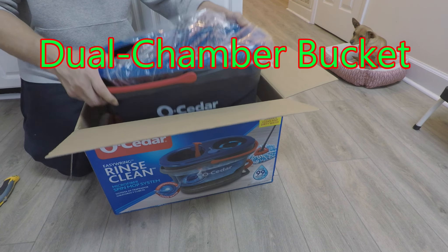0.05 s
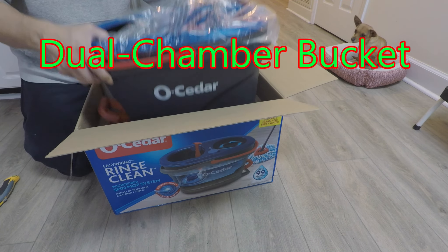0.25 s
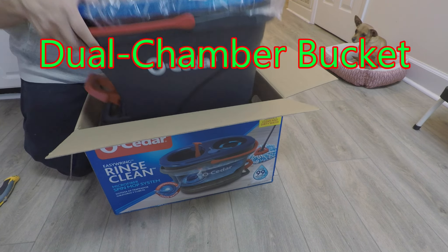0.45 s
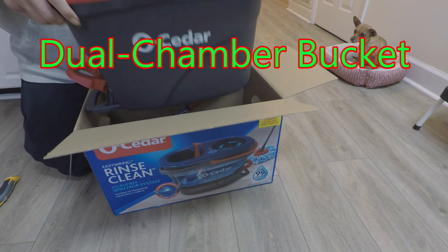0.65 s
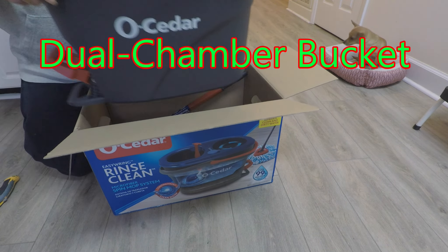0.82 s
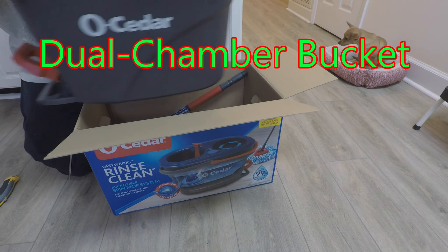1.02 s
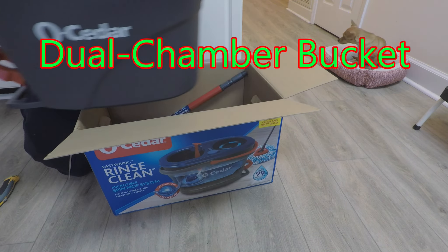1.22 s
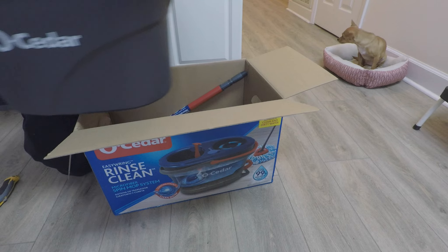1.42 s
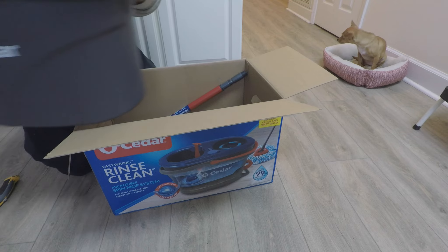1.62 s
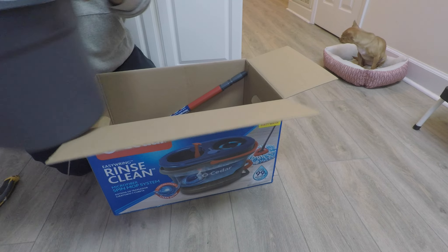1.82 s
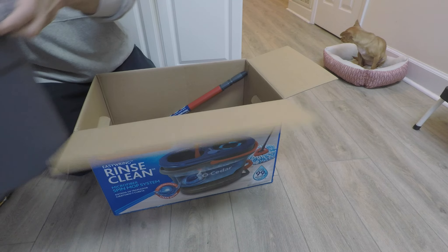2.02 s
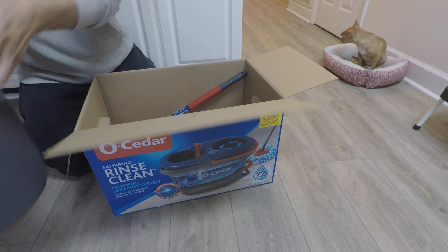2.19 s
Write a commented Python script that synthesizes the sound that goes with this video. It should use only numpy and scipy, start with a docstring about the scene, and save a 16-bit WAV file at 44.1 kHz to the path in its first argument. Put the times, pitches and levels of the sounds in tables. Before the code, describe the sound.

A plastic bucket rubs and knocks against cardboard with low, hollow thumps as it is pulled from a box. After a lull it lightly taps a loose flap, and plastic wrap crinkles faintly in the small, quiet room.

```python
"""Plastic rubs up cardboard, catches and knocks: a bucket is pulled from its box in a small quiet room.
Each rub is a stream of tiny slips; each knock sets the bucket ringing, over low booms of box and bucket.
After a lull the bucket brushes past a loose flap with hollow taps and is carried aside,
with ticks of creased plastic wrap, a soft rustle and one faint squeak."""
import sys
import numpy as np
from scipy import signal
from scipy.fft import rfft, irfft
from scipy.io import wavfile

SR = 44100
rng = np.random.default_rng(int(sys.argv[2]) if len(sys.argv) > 2 else 0)


def digitize_waveform(pressure):
    """Quantize a signal to 16-bit integers and store it at the path in sys.argv[1].

    Rows of a 2-D input are taken as channels; values are limited to [-1, 1].
    """
    field = np.atleast_2d(pressure).T
    bounded = np.clip(field, -1, 1)
    quanta = np.round(bounded * 32767).astype(np.int16)
    wavfile.write(sys.argv[1], SR, quanta)


N = 103635

# colour of plastic on cardboard: f/Hz, gain/dB
CONTACT_EQ = [(30, -50), (100, 7.5), (170, 5.5), (300, 2.5), (375, -8.5), (480, 2.5), (620, 2.5),
              (740, -4.5), (1100, -3), (1300, -9.5), (2000, -9), (2600, -12.5), (4700, -19.5),
              (5800, -22.5), (7500, -24.5), (12000, -32), (15000, -39)]
# damped resonances of the bucket's shell: f/Hz, width/Hz, gain/dB
SHELL_PEAKS = [(453, 18.6, 6.5), (610, 100, -5.5), (1437, 290, -2), (1980, 100, 0.5), (2880, 90, -4),
               (3717, 156, 6), (4560, 270, 3), (5040, 144, 9.5), (6410, 65, -6), (7350, 520, 8.5),
               (8360, 130, 8.5), (9950, 510, 7.5), (11930, 1030, 11)]
# the notes the bucket rings with: f/Hz, level/dB, t60/s
BUCKET_MODES = [(160.5, -18.5, .2), (293, -26.5, 0.23), (311.8, -21, 0.16), (466.5, -22, 0.26),
                (568, -33, 0.15), (571, -20.5, 0.068), (651, -23, 0.12), (828, -29, 0.28),
                (1120, -32.5, 0.43), (1590, -28, 0.21), (2036, -32, 0.12), (2915, -29, 0.11),
                (3660, -33.5, 0.084)]
# bucket hits box: t/s, level/dB, bass/dB, crack/dB, top/dB, crunch decay/s, ring/dB, favoured f/Hz
BUCKET_KNOCKS = [(.0618, -48, 9, 8, -15, 0.0085, -4, 610), (.071, -39, 8, -1.5, -3, 0.015, -1.5, 175),
                 (.230, -22, -14, 7, 3.5, 0.0092, -2.5, 455),
                 (.2358, -10.5, -6, -6.5, 2.5, 0.0049, -9.5, 587), (.2398, -17, -1, 2, 17, 0.003, -1, 242),
                 (.3965, -35, -7, -20, -7, 0.0025, 6.5, 590), (.402, -35, 6, -4.5, 0.5, 0.014, 3.5, 163),
                 (.5122, -16, 5, -1.5, -25, 0.0087, -4, 175), (.530, -22, -0.5, -10, 0, 0.0049, -1.5, 312),
                 (.545, -34, 1, 3, 8, 0.0046, -1, 460), (.6145, -19.5, -3.5, 5, -8.5, 0.0065, -3.5, 298),
                 (.650, -24.5, -10, 6.5, 9, 0.0038, -15, 302), (.692, -32, -4, 1, -6, 0.0072, 3, 586),
                 (.889, -41, 3.5, 2.5, -1, 0.007, -6, 620), (.911, -43, 1, 5, -21, 0.0084, -0.5, 175),
                 (2.345, -46, 1, 24.5, 20, 0.002, 0, 610)]


def knock(level_db, bass_db, crack_db, top_db, decay, ring_db, spot_hz):
    """The bucket catches on the box: a short crunch of contact, then its modes ring on."""
    t = np.arange(SR // 2) / SR
    out = np.zeros(len(t))
    for hz, db, t60 in BUCKET_MODES:
        out += amp(db + ring_db + favour_db(hz, spot_hz) - 60 * t / t60) * np.sin(2 * np.pi * hz * t)
    crunch = burst(decay)
    crunch *= np.minimum(t[:len(crunch)] / 0.00062, 1)  # cardboard yields, softening the attack
    shell_db = 0.2 * (level_db + 20)  # harder knocks wake the shell more
    add(out, 0, resonate(colour(crunch, CONTACT_EQ), SHELL_PEAKS, shell_db))
    return tone(out, level_db, bass_db, crack_db, top_db)


# strokes up the box walls: t/s, rise/s, fall/s, level/dB, bass/dB, crack/dB, top/dB
WALL_RUBS = [(0, 0.0026, 0.38, -54.5, 9.5, 0.5, 10.5), (.14, 0.043, 0.11, -39.5, -0.5, 2.5, 7.5),
             (.205, 0.042, 0.015, -26.5, -5, 0.5, -2), (.43, 0.055, 0.054, -42, -12, 1, 14),
             (.496, 0.015, 0.017, -31.5, -10.5, 3.5, 17.5), (.522, 0.0074, 0.032, -30, 4, 0.5, 4.5),
             (.616, 0.014, 0.054, -27, -7, 5.5, 2.5), (.66, 0.022, 0.085, -38.5, 1, 6.5, 4.5),
             (.87, 0.028, 0.26, -54.5, 4.5, 4, 2), (1.70, 0.038, 0.13, -58, -13, 6.5, 5),
             (1.96, 0.045, 0.31, -52.5, -1, -7, -9)]


def rub(rise, fall, *tone_db):
    """Plastic slips along cardboard in one swell; the shell flexes, so its resonances wander."""
    t = np.arange(0, rise + fall, 1 / SR)
    swell = np.interp(t, [0, rise, rise + fall], [0, 1, 0])
    slips = grains(SR, per_s=9000, spread_db=4)[:len(t)] * swell
    progress = t / (rise + fall)
    out, flex = 0, 0.07
    for fade in 1 - progress, progress:  # crossfade between two detunings of the shell
        flexed = [(hz * (1 + flex * rng.uniform(-1.14, 1)), width, db) for hz, width, db in SHELL_PEAKS]
        out = out + resonate(colour(slips * fade, CONTACT_EQ), flexed, ring_db=-13.5)
    return tone(out, *tone_db)


# low booms of box and bucket: t/s, f/Hz, level/dB, rise/s, t60/s
LOW_BOOMS = [(0, 73.1, -44, 0.011, 0.86), (0.183, 62.5, -40.5, 0.009, 0.22),
             (.238, 56, -29.5, 0.029, 0.048), (0.286, 61.5, -30.5, 0.019, 0.062),
             (0.406, 70.6, -47.5, 0.014, 0.48), (.511, 66.4, -23, 0.015, 0.29),
             (0.637, 66.3, -30, 0.027, 0.35), (0.7503, 82.2, -39, 0.01, 0.25),
             (1.857, 151, -55.5, 0.011, 0.25), (1.862, 81.7, -47.5, 0.015, 0.47),
             (2.031, 29, -34.5, 0.025, 0.14), (2.107, 75.4, -43, 0.025, 0.15)]


def boom(hz, level_db, rise, t60):
    """A low note swells and dies away."""
    t = np.arange(SR) / SR
    envelope = np.minimum(t / rise, 1) * amp(level_db - 60 * np.maximum(t - rise, 0) / t60)
    return -envelope * np.sin(2 * np.pi * hz * t)


# dull body of the flap: f/Hz, gain/dB
FLAP_EQ = [(60, -5.5), (230, 2), (600, -6.5), (900, -12), (1500, -8.5), (2200, -28), (12000, -27)]
# its hollow resonances: f/Hz, width/Hz, gain/dB
FLAP_PEAKS = [(298.5, 10, -0.5), (416, 19, 4.5), (517, 18, -2), (731, 44, 12), (1350, 240, -4)]
# bucket brushes flap: t/s, level/dB, rise/s, decay/s, crack/dB, favoured f/Hz
FLAP_HITS = [(1.751, -41.5, 0.0072, 0.0067, 7, 1310), (1.830, -31, 0.0012, 0.017, -3, 423),
             (1.851, -32.5, 0.0026, 0.0108, -13, 317), (2.019, -38, 0.0048, 0.013, -9, 714),
             (2.051, -38.5, 0.0062, 0.011, -12, 735)]


def flap(level_db, rise, decay, crack_db, spot_hz):
    """A soft, hollow tap on the loose cardboard flap."""
    tap = burst(decay)
    tap *= np.minimum(np.arange(len(tap)) / SR / rise, 1)
    peaks = [(hz, width, db + favour_db(hz, spot_hz)) for hz, width, db in FLAP_PEAKS]
    return tone(resonate(colour(tap, FLAP_EQ), peaks), level_db, 0, crack_db, 0)


# plastic wrap ticks: t/s, level/dB, centre f/Hz, decay/s
WRAP_TICKS = [(.0135, -46.5, 10500, 0.00057), (.1153, -47, 12800, 0.0016), (.1325, -42, 7360, 0.00037),
              (.8955, -50.5, 7800, .001), (.9625, -52.5, 7300, 0.00084), (1.0, -46, 3000, 0.003),
              (1.1755, -48, 6800, 0.0014), (1.327, -51.5, 4630, .0008), (1.8215, -43, 3830, 0.0015),
              (1.8305, -50, 13000, 0.0014), (1.8472, -39.5, 8650, 0.00089), (1.852, -49, 12500, 0.004),
              (1.9025, -48, 11100, 0.00077), (1.9405, -49.5, 8240, 0.0057), (1.972, -37, 9100, 0.00057),
              (2.029, -34, 12800, 0.002), (2.1875, -40.5, 8700, 0.0021), (2.210, -40, 4960, 0.001),
              (2.249, -45, 8000, .001), (2.262, -50, 8600, .002), (2.277, -45.5, 7600, 0.0036)]


def tick(level_db, centre_hz, decay, octaves=0.59, ripple_db=4.5):
    """One crease of the wrap snaps, with its own uneven colour."""
    hz = np.geomspace(1000, 16000, 48)
    hump_db = -10 * np.log10(1 + (np.log2(hz / centre_hz) / octaves) ** 4)
    crease_db = hump_db + ripple_db * np.clip(rng.standard_normal(len(hz)), -1.5, 1.5)
    # the ripple changes the colour but not the power
    crease_db -= 10 * np.log10(np.sum(hz * amp(crease_db) ** 2) / np.sum(hz * amp(hump_db) ** 2))
    return amp(level_db) * colour(burst(decay), [(100, -45), *zip(hz, crease_db)])


# colour of wrap and sleeve: f/Hz, gain/dB
RUSTLE_EQ = [(100, 5), (700, -3), (1500, -3), (3200, -1.5), (5500, -6), (8000, -9.5), (13000, -13.5),
             (16000, -26)]
# their rustle through the carry: t/s, level/dB, brightness/dB
RUSTLE_RIDE = [(1.65, -85, 14), (1.82, -65, 3), (1.92, -70, 6), (2.0, -57, 8.5), (2.08, -61, 0.5),
               (2.18, -62, -2), (2.27, -58.5, 4), (2.35, -60.5, -5)]


def rustle():
    """Fine crinkling that grows, and dulls, as the bucket swings aside."""
    times, level_db, bright_db = np.transpose(RUSTLE_RIDE)
    t = np.arange(N) / SR
    crinkle = unit(colour(grains(N, per_s=5000, spread_db=3.2), RUSTLE_EQ)[:N])
    highs = signal.sosfiltfilt(signal.butter(2, 7000, "high", fs=SR, output="sos"), crinkle)
    tilt = amp(np.interp(t, times, bright_db) / 2)
    envelope = amp(np.interp(t, times, level_db)) * (t > times[0])
    return ((crinkle - highs) / tilt + highs * tilt) * envelope


def squeak(length, hz, width_hz, rise_hz_per_s, level_db):
    """Fast slips excite one narrow, slowly rising resonance."""
    t = np.arange(0, length, 1 / SR)
    slips = np.exp(2j * np.pi * rng.random(SR))
    flutter = signal.lfilter([1], [1, -np.exp(-np.pi * width_hz / SR)], slips)[:len(t)]
    glide = np.exp(2j * np.pi * np.cumsum(hz + rise_hz_per_s * t) / SR)
    return amp(level_db) * unit((flutter * glide).real) * np.sin(np.pi * t / length)


# reverb time: f/Hz, t60/s
ROOM_DECAY = [(80, 1), (300, 0.25), (1000, 0.77), (3000, 0.63), (7000, 0.57), (14000, 0.32)]
# reverb return: f/Hz, level/dB
ROOM_RETURN = [(100, -6.5), (500, -9), (2500, -12.5), (7000, -13), (14000, -17.5)]


def room(x, predelay_s=0.006):
    """Dense reflections of a small hard-floored room, each band dying at its own speed."""
    hz, t, bands = signal.stft(rng.choice([-1., 1.], SR // 2), SR, nperseg=256)
    t60 = read(ROOM_DECAY, hz)[:, None]
    bands *= amp(read(ROOM_RETURN, hz)[:, None] - 60 * t / t60)
    bands *= np.sqrt(2 * np.log(1000) / t60 / SR)  # a longer tail gains no energy
    tail = signal.istft(bands, SR, nperseg=256)[1]
    out = np.zeros(N)
    add(out, predelay_s, signal.fftconvolve(x, tail))
    return out


# colour of the room tone: f/Hz, gain/dB
ROOM_TONE_EQ = [(8, -0.5), (22, -4), (37, 3), (52, -13.5), (72, -10), (115, -21), (170, -24.5), (320, -22),
                (480, -28), (900, -33.5), (2000, -36.5), (6000, -42.5), (15500, -47)]


def room_tone(level_db):
    """A steady bed of low rumble and faint hiss."""
    hz = np.fft.rfftfreq(N, 1 / SR)
    spectrum = np.exp(2j * np.pi * rng.random(len(hz))) * amp(read(ROOM_TONE_EQ, hz))
    return amp(level_db) * unit(irfft(spectrum, N))


# centres of the bass, mid, crack and top bands: f/Hz
TONE_BANDS = [160, 500, 2200, 12000]


def tone(x, level_db, bass_db, crack_db, top_db):
    """Gives one contact its strength and hardness."""
    return amp(level_db) * colour(x, list(zip(TONE_BANDS, [bass_db, 0, crack_db, top_db])))


def favour_db(hz, spot_hz, octaves=0.2):
    """The spot that is struck lifts modes near spot_hz and holds back the rest."""
    return -5 + 14 * np.exp(-(np.log2(hz / spot_hz) / octaves) ** 2)


def burst(decay, size=4096):
    """A sudden, quickly dying rattle with an even spectrum."""
    fade = np.exp(-np.arange(size) / SR / decay)
    x = rng.standard_normal(size) * fade
    for _ in range(5):
        whitened = irfft(np.exp(1j * np.angle(rfft(x))))
        x = whitened * np.sqrt(np.minimum(2 * np.sqrt(fade), 1))
    return unit(x) / unit(fade).max()


def grains(n, per_s, spread_db):
    """Tiny slips of uneven size over a smooth hiss."""
    size = amp(spread_db * np.minimum(rng.exponential(1, n), 4))
    slips = size * rng.choice([-1, 1], n) * (rng.random(n) < per_s / SR)
    return unit(unit(slips) + 0.9 * rng.standard_normal(n))


def resonate(x, peaks, ring_db=0):
    """Adds damped resonances to a sound."""
    return x + sum(amp(db + ring_db) * signal.lfilter(*signal.iirpeak(hz, hz / width, SR), x)
                   for hz, width, db in peaks)


def colour(x, points, size=4096):
    """Minimum-phase EQ through points of f/Hz, gain/dB."""
    log_gain = np.log(amp(read(points, abs(np.fft.fftfreq(size, 1 / SR)))))
    taps = np.fft.ifft(np.exp(np.conj(signal.hilbert(log_gain)))).real
    return signal.fftconvolve(x, taps[:size // 2])


def read(points, hz):
    """Reads a table on a log-frequency axis."""
    f, value = np.transpose(points)
    return np.interp(np.log(hz + 1), np.log(f + 1), value)


def amp(db):
    """Decibels to gain."""
    return 10 ** (np.asarray(db) / 20)


def unit(x):
    """Scales to rms 1."""
    return x / np.sqrt(np.mean(x ** 2) + 1e-20)


def add(mix, start_s, sound):
    """Mixes a sound in at its cue."""
    part = mix[max(round(start_s * SR), 0):][:len(sound)]
    part += sound[:len(part)]


def scene(count=3):
    """Mono mix. Contacts take turns among three reverb tails, so no one ring repeats."""
    sends, booms = np.zeros((count, N)), np.zeros(N)
    sends[0] += rustle()
    add(sends[1], 2.215, squeak(length=0.115, hz=2745, width_hz=90, rise_hz_per_s=1710, level_db=-65))
    for cues, source in (BUCKET_KNOCKS, knock), (WALL_RUBS, rub), (FLAP_HITS, flap), (WRAP_TICKS, tick):
        for k, (start_s, *settings) in enumerate(cues):
            add(sends[k % count], start_s, source(*settings))
    for start_s, *settings in LOW_BOOMS:
        add(booms, start_s, boom(*settings))
    return (sum(x + room(x) for x in sends) + booms + room_tone(level_db=-55.5))[None]


def record(dry, cutoff_hz=15600):
    """A steep low-pass trims the very top of the mix."""
    lowpass = signal.firwin(401, cutoff_hz, window=("kaiser", 8), fs=SR)
    return signal.oaconvolve(dry, lowpass[None], "same")


dry = scene()
out = record(dry)
digitize_waveform(out)
```